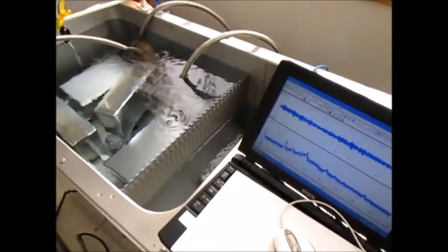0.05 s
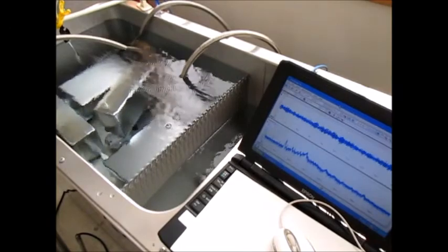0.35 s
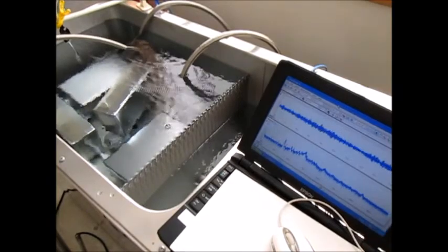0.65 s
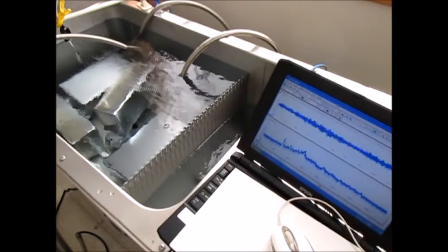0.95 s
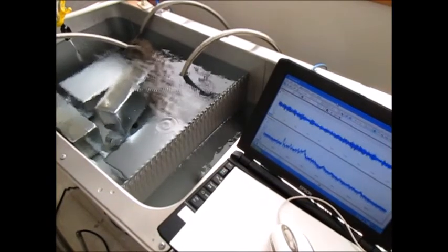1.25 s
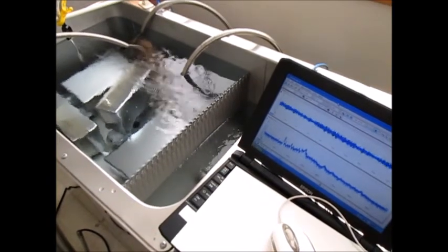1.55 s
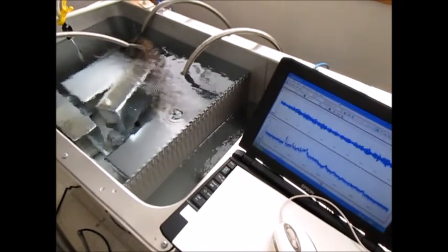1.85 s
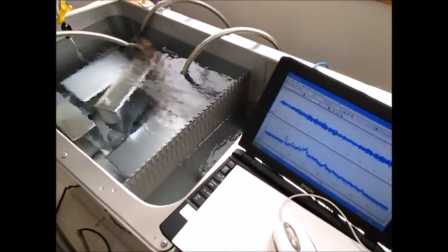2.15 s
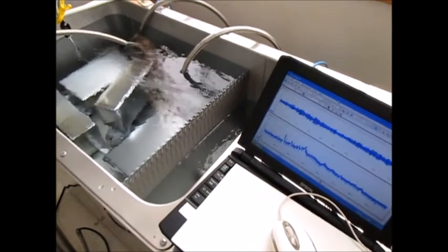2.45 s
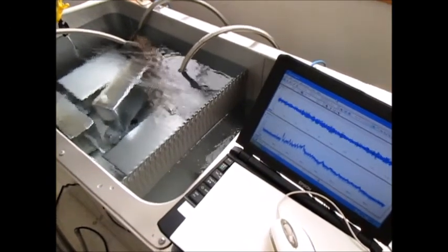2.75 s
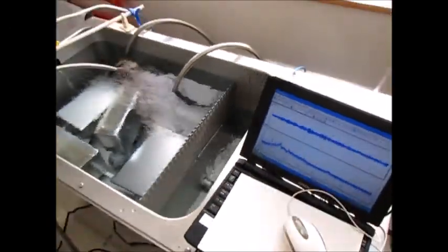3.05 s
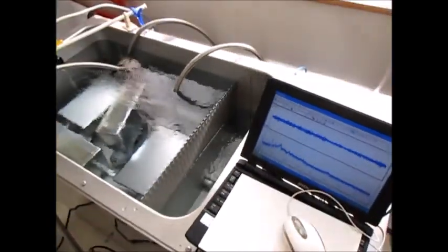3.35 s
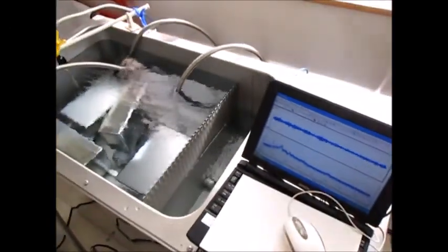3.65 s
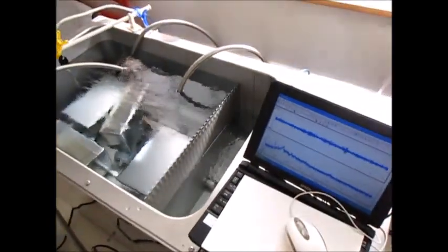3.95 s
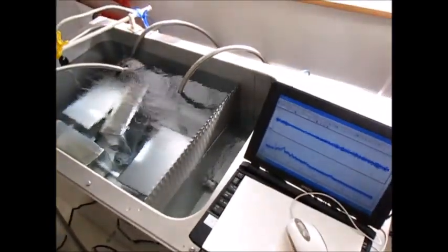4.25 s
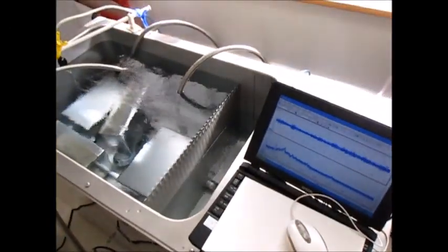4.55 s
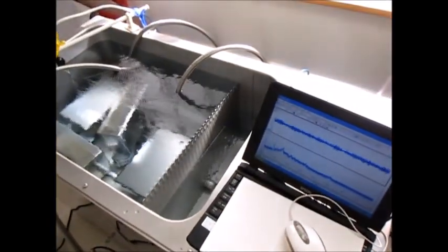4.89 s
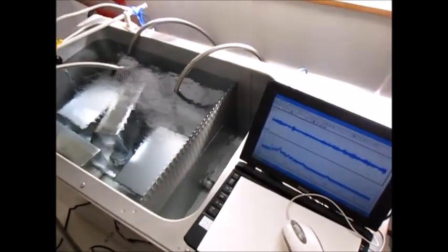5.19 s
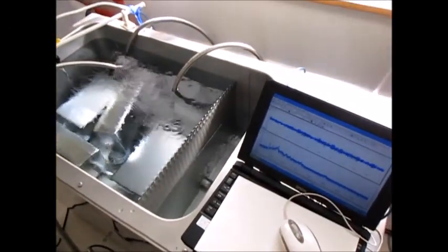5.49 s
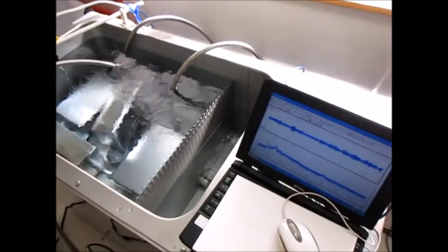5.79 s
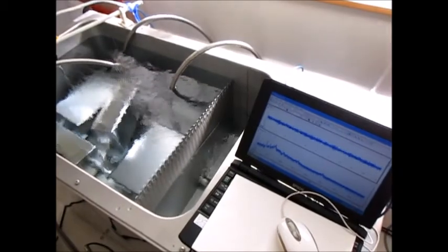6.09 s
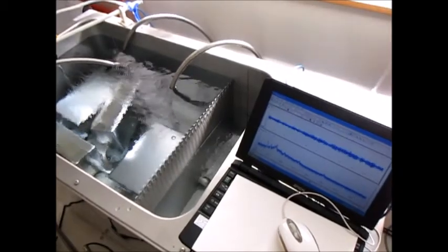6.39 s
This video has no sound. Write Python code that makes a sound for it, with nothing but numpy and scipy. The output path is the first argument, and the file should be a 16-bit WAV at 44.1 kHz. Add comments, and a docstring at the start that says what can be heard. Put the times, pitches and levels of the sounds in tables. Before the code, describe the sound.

Close to a running ultrasonic bath in a lab, the steel walls ring with a piercing whine while tiny bubbles make a fast-pulsing hiss. Underneath, a low buzzing hum swells and sinks unevenly, with faint pump tones and a soft rush of water. Everything drops out abruptly just before halfway, then returns and carries on to the end.

```python
"""A low, throbbing hum under a shrill whine and hiss: an ultrasonic tank is running in a lab.
Its drive repeats a sweep ten times a second, each a train of short bursts that push the bath and
rattle the tank. The steel walls ring, cavitation bubbles collapse, and a pump sings faintly over
the circulating water. Near the middle the sound cuts out for a moment."""
import sys
import numpy as np
from scipy import signal
from scipy.fft import rfft, irfft, next_fast_len
from scipy.io import wavfile
from scipy.ndimage import uniform_filter1d, map_coordinates

SR = 44100
rng = np.random.default_rng(int(sys.argv[2]) if len(sys.argv) > 2 else 0)


def transcribe(u):
    """Save the signal u as a 16-bit wav file named by the first command-line argument.

    u: samples, shape (n,) or (channels, n), limited to [-1, 1]; the rate is SR.
    q: integer samples, one column per channel.
    """
    v = np.clip(np.atleast_2d(u).T, -1, 1)
    q = np.round(v * 32767).astype(np.int16)
    wavfile.write(sys.argv[1], SR, q)


N = 292383
TIME = np.arange(N) / SR
SWEEP_HZ, SURGE_HZ = 10, 10.125
RING_ECHO_S = .01096
SILENCE_FROM_S, SILENCE_TO_S = 2.79, 3.094


def amp(db):
    """Decibels to amplitude gain."""
    return np.exp(np.asarray(db) * np.log(10) / 20)


def unit(x):
    """Normalisation to rms 1."""
    return x / np.sqrt(np.mean(x ** 2) + 1e-20)


def curve(rows):
    """Linear interpolation of (seconds, value) rows, one value a sample."""
    return np.interp(TIME, *np.transpose(rows))


def swing(level_db):
    """A level's departure from its mean."""
    return level_db - level_db.mean()


def wobble(rate_hz):
    """Smooth random modulation: a spline through rate_hz knots a second."""
    coarse = TIME[::100]
    knots = rng.standard_normal(256)
    return np.interp(TIME, coarse, map_coordinates(knots, [coarse * rate_hz], mode="mirror"))


def either(before, after):
    """Sound varies with position: after the silence the tank is heard from a slightly different place."""
    return np.where(TIME < SILENCE_TO_S, before, after)


def filtered(x, response):
    """Linear filtering: the spectrum of x times a complex frequency response."""
    size = next_fast_len(N + SR // 2)
    return irfft(rfft(x, size) * response(np.fft.rfftfreq(size, 1 / SR)), size)[:N]


def coloured(x, spectrum):
    """Spectral shaping by (Hz, dB) points on a log frequency axis, at rms 1."""
    points_hz, db = np.transpose(spectrum)
    return unit(filtered(x, lambda hz: amp(np.interp(np.log(hz + 1), np.log(points_hz), db))))


def hum_order(centre_hz, width_hz, lag_s, drift_rad, waver_db):
    """Sidebands: an order restarts softly with each sweep, which splits it into close lines that beat."""
    tone = np.zeros(N)
    start_rad = np.pi / 4  # the orders share one starting phase, then drift apart into a wavering hum
    for step in range(-2, 3):
        line_hz = SWEEP_HZ * (round(centre_hz / SWEEP_HZ) + step)
        offset_hz = line_hz - centre_hz
        strength = np.sinc(offset_hz / width_hz) * np.exp(-(offset_hz / (2 * width_hz)) ** 2)
        phase = 2 * np.pi * (line_hz * TIME - offset_hz * lag_s) + start_rad + drift_rad * wobble(2.5)
        tone += strength * amp(waver_db * wobble(3.053)) * np.cos(phase)
    return unit(tone)


def sliding_lag(stretches):
    """Linear drift of the moment in each sweep at which the hum swells, set anew after the silence."""
    (lag_before, slide_before), (lag_after, slide_after) = stretches
    return either(lag_before + slide_before * TIME, lag_after + slide_after * (TIME - SILENCE_TO_S))


def bath_hum(throb_db):
    """Forced vibration: the bursts push the bath. Low orders throb most, upper ones are least steady."""
    # Hum orders before and after the silence. Each row: centre in Hz, width in Hz, base level in dB.
    orders_before = [(95.1, 13.5, -23.5), (187.8, 11.4, -24.5), (280.5, 16.3, -31), (376.5, 14.2, -35.5),
                     (469, 16, -38.5), (573, 17, -46.5)]
    orders_after = [(94.8, 12.8, -24.5), (184.2, 13, -26.5), (279.2, 20, -32), (377.6, 19, -36.5),
                    (468, 14, -43), (574, 18, -44)]
    # How each order varies. Each row: dB per dB of throb, dB per dB of midrange swing,
    # waver in dB, phase drift in radians.
    habits = [(1.2, 0, 1.6, 0.3), (0.94, 0, 1, 0.41), (0.36, 1.45, 2, 0.9), (.4, 0.9, 2, 0.84),
              (0.54, 0, 3, 1), (0.2, 0, 3.5, .9)]
    # The hum's midrange, about 250 to 400 Hz. Each row: time in seconds, relative level in dB.
    midrange = [(0.0, -25), (0.53, -28.5), (1.32, -28.0), (1.72, -31.5), (4.38, -28.0), (4.59, -24),
                (4.91, -31.0), (5.45, -26.5), (5.87, -30.5), (6.09, -26.0), (6.19, -34), (6.62, -23.5)]
    # Lag of the swell, before then after the silence.
    # Each row: starting lag in seconds, slide in seconds per second.
    first_order_lag = [(0.029, 0.0088), (-0.016, 0.025)]
    higher_order_lag = [(.012, -.012), (-0.039, 0.0137)]
    midrange_db = swing(curve(midrange))
    hum = np.zeros(N)
    for order, (per_throb, per_midrange, waver_db, drift_rad) in enumerate(habits):
        lag_s = sliding_lag(higher_order_lag if order else first_order_lag)
        before, after = [amp(db) * hum_order(hz, width_hz, lag_s, drift_rad, waver_db)
                         for hz, width_hz, db in (orders_before[order], orders_after[order])]
        hum += amp(per_throb * throb_db + per_midrange * midrange_db) * either(before, after)
    return hum


def repeating_noise(memory, fresh):
    """Correlated noise: each sweep replays a pattern that the moving water slowly renews."""
    sweep_samples = SR // SWEEP_HZ
    sweeps = rng.standard_normal((2 * (N // sweep_samples + 1), sweep_samples))
    pattern = signal.lfilter([1], [1, -memory], sweeps, axis=0).ravel()[-N:]
    return np.sqrt(1 - fresh) * unit(pattern) + np.sqrt(fresh) * rng.standard_normal(N)


def bursts(burst_hz, sharpness):
    """Amplitude modulation that peaks once a burst and starts afresh with every sweep."""
    sweep_time = TIME % (1 / SWEEP_HZ)
    return unit(np.exp(sharpness * np.cos(2 * np.pi * burst_hz * sweep_time)))


def echoing(x, delay_s, carry):
    """Comb filtering: x returns again and again, weaker each time, raising evenly spaced peaks."""
    return filtered(x, lambda hz: 1 / (1 - carry * np.exp(-2j * np.pi * hz * delay_s)))


def surge():
    """Periodic modulation: cavitation rises and falls about once a sweep, between -1 and 1."""
    peak_s = either(.078, .043)
    return np.cos(2 * np.pi * SURGE_HZ * (TIME - peak_s))


def tank_buzz(level_db):
    """Pulsed excitation: every burst rattles the tank with a puff of noise that rings on."""
    # The rattle's spectrum. Each row: frequency in Hz, relative density in dB.
    spectrum = [(60, 4), (130, 10.5), (250, 10.5), (450, 4.5), (600, 0.5), (900, 0.5), (1150, -0.5),
                (1550, -6), (2000, -13), (2300, -7), (2500, -16.5), (3200, -18.5), (4500, -16),
                (7000, -48.5)]
    puffs = repeating_noise(memory=0.88, fresh=0.74) * bursts(burst_hz=94.76, sharpness=0.51)
    rattle = echoing(puffs, delay_s=.00996, carry=0.41)
    flutter_db = .6 * surge() + wobble(40)
    return amp(level_db + flutter_db) * coloured(rattle, spectrum)


def tones(lines, waver_db, drift_rad, rate_hz):
    """Superposition of sines at (Hz, dB), each wandering in level and phase on its own."""
    total = np.zeros(N)
    for hz, db in lines:
        phase = 2 * np.pi * (hz * TIME + rng.random()) + drift_rad * wobble(rate_hz)
        total += np.sqrt(2) * amp(db + waver_db * wobble(rate_hz)) * np.sin(phase)
    return total


def wall_whine(level_db):
    """Resonance: the steel walls ring from burst to burst in a comb of shrill lines; a few sing out."""
    # The comb's envelope. Each row: frequency in Hz, relative density in dB.
    spectrum = [(3000, -64), (4400, -20), (5400, -10.5), (6000, -4.5), (6250, 1), (6550, -1.5), (6900, -1),
                (7150, 0), (7500, 1), (7950, -1.5), (8350, 1), (8650, -7), (9500, -14), (12000, -43)]
    # Strongest wall tones before and after the silence. Each row: frequency in Hz, relative level in dB.
    walls_before = [(5749, -39), (5927, -47), (6202, -37), (6298, -30.5), (7020, -37), (7111, -34.5),
                    (7311, -32.5), (7402, -35.5), (7483, -29.5), (7682, -36), (7763, -50), (7957, -37)]
    walls_after = [(5744, -40.5), (6196, -50), (6298, -35.5), (6395, -34.5), (7117, -38), (7203, -39),
                   (7300, -46), (7391, -33), (7499, -47), (7590, -35), (7660, -41), (7768, -54)]
    excitation = repeating_noise(memory=0.882, fresh=0.5)
    ring = coloured(echoing(excitation, RING_ECHO_S, carry=0.48), spectrum)
    singing = either(*[tones(lines, waver_db=-3.0, drift_rad=.9, rate_hz=5.6)
                       for lines in (walls_before, walls_after)])
    ring_db = level_db - 3.64 + surge() + 0.29 * wobble(13)
    return amp(ring_db) * ring + amp(swing(level_db) - 4.0) * singing


def cavitation_hiss(level_db):
    """Cavitation: countless tiny bubbles collapse in a fine hiss; its narrow top rings and surges most."""
    # Spectra of the broad hiss and its ringing top. Each row: frequency in Hz, relative density in dB.
    hiss_spectrum = [(1500, -13.5), (3200, -14), (4400, -10.5), (6000, -14), (8000, -6.5), (9300, -4),
                     (11000, 0), (12100, -1), (13000, 1.5), (14000, -9.5), (15700, -11.5)]
    sizzle_spectrum = [(10000, -35.5), (11500, -5), (12200, -6.5), (12520, 4.5), (12760, -3.5),
                       (13000, -11), (14000, -17), (15700, -28.5)]
    noise = rng.standard_normal(N)
    grain_db = unit(uniform_filter1d(rng.standard_normal(N), size=40))
    hiss = coloured(noise * amp(grain_db), hiss_spectrum)
    hiss_db = -1.92 + 0.73 * surge() + 1.1 * wobble(30)
    sizzle = coloured(echoing(rng.standard_normal(N), RING_ECHO_S, carry=.45), sizzle_spectrum)
    sizzle_db = -9.5 + 5.7 * surge() + 0.87 * wobble(20)
    return amp(level_db) * (amp(hiss_db) * hiss + amp(sizzle_db) * sizzle)


def circulation():
    """Tonal and broadband flow noise: the pump sings faintly over the low wash of the water."""
    # Pump tones before and after the silence. Each row: frequency in Hz, relative level in dB.
    pump_before = [(1012, -56), (1104, -49.5), (1200, -58), (1303, -49), (1378, -61.5), (1658, -50),
                   (1755, -50), (2207, -50.5)]
    pump_after = [(1001, -52), (1104, -47.5), (1200, -51), (1567, -51), (1658, -63), (2105, -69),
                  (2207, -49.5), (2762, -50.5)]
    # The water's spectrum. Each row: frequency in Hz, relative density in dB.
    spectrum = [(15, -14), (27, 4.5), (38, -12), (60, 2.5), (150, -1.5), (400, -6.5), (1000, -22.5),
                (3000, -35)]
    pump = either(*[tones(lines, waver_db=2.5, drift_rad=0.49, rate_hz=2.6)
                    for lines in (pump_before, pump_after)])
    wash = coloured(rng.standard_normal(N), spectrum)
    wash_db = either(-46, -33.5) + 1.5 * wobble(8.7)
    return amp(-3) * pump + amp(wash_db) * wash


def scene():
    """Superposition in two like channels: throb drives hum, cavitation whine and hiss, both the buzz."""
    # How hard the bath throbs and cavitates. Each row: time in seconds, relative level in dB.
    throb_levels = [(0.0, -22), (0.36, -24), (0.77, -34), (0.97, -24.0), (1.4, -19), (2.1, -24.5),
                    (2.52, -24), (2.74, -21), (3.21, -19), (3.29, -36), (3.41, -16), (3.55, -20.5),
                    (3.74, -31), (3.97, -28), (4.06, -20.5), (4.26, -18.5), (4.36, -24.0), (4.57, -27.0),
                    (4.75, -15.5), (4.97, -28.5), (5.3, -27), (5.73, -18.5), (6.17, -30.5), (6.4, -20),
                    (6.62, -26)]
    cavitation_levels = [(0.0, -23.0), (1.19, -17.5), (1.59, -20.5), (2.61, -18), (3.1, -18), (3.19, -20.5),
                         (4.04, -18), (4.46, -20), (4.91, -19), (5.42, -17), (5.98, -19.5), (6.11, -18.0),
                         (6.62, -18.5)]
    throb_db = swing(curve(throb_levels))
    cavitation_db = curve(cavitation_levels)
    buzz_db = -29.5 + 0.37 * throb_db + .6 * swing(cavitation_db)
    tank = (bath_hum(throb_db) + tank_buzz(buzz_db) + wall_whine(cavitation_db + 1)
            + cavitation_hiss(cavitation_db - 3) + circulation())
    return np.array([tank, tank])


def record(dry):
    """Filtering and gating: a narrow notch in the treble, a brief total silence and a band limit."""
    notch_hz, top_hz = 7848, 15730
    gate = (TIME < SILENCE_FROM_S) | (TIME > SILENCE_TO_S)
    notch = lambda hz: (hz - notch_hz - 6j) / (hz - notch_hz - 85j)
    low_pass = lambda hz: np.clip((top_hz - hz) / 40 + 1, 0, 1)
    return np.array([filtered(filtered(channel, notch) * gate, low_pass) for channel in dry])


dry = scene()
out = record(dry)
transcribe(out)
```